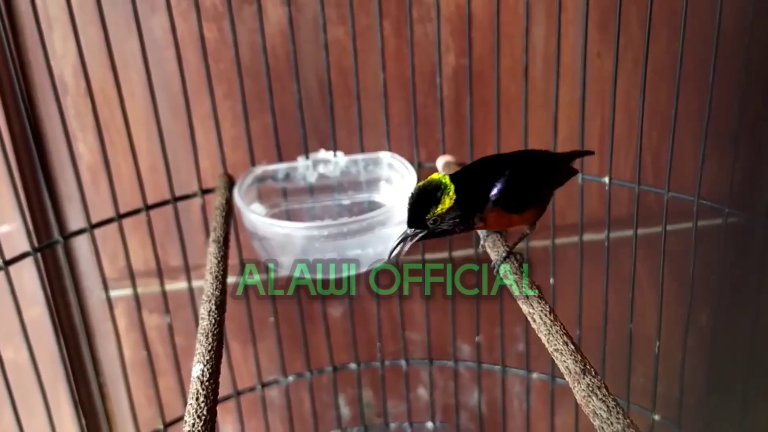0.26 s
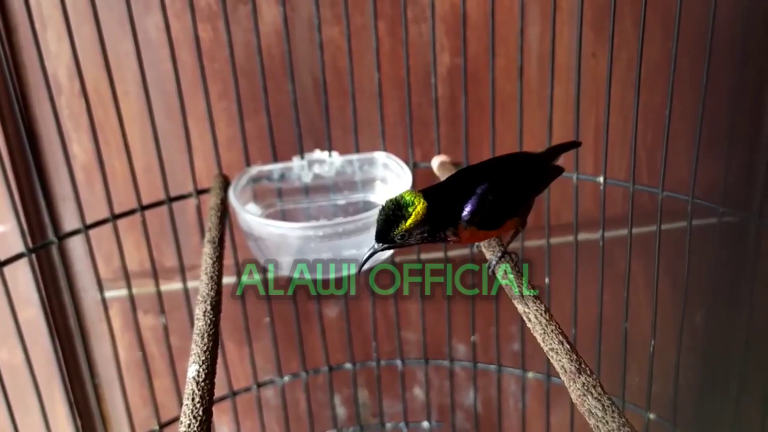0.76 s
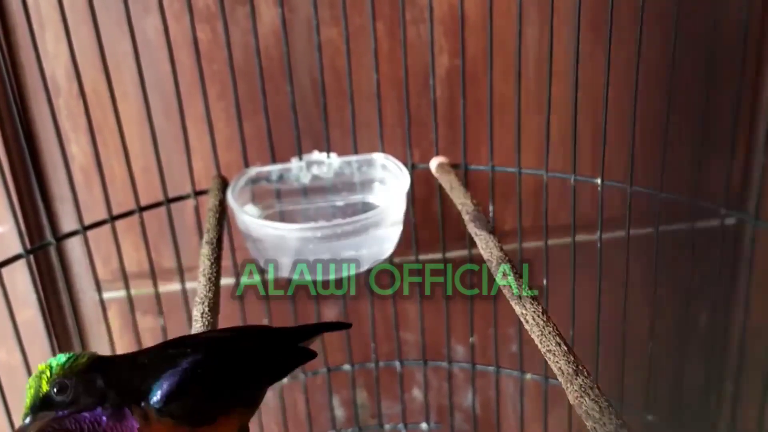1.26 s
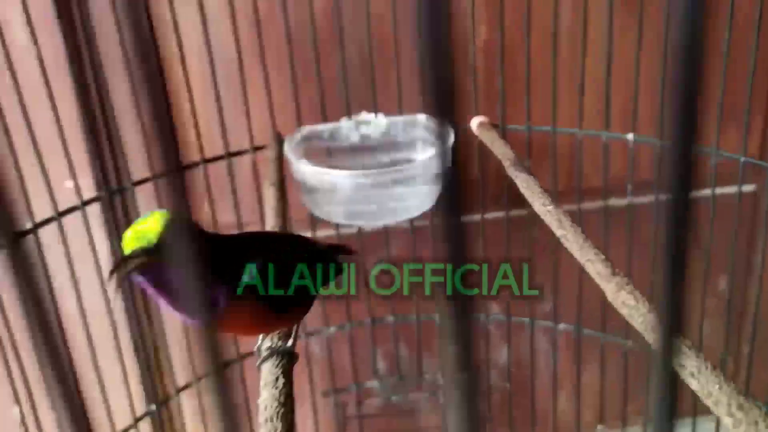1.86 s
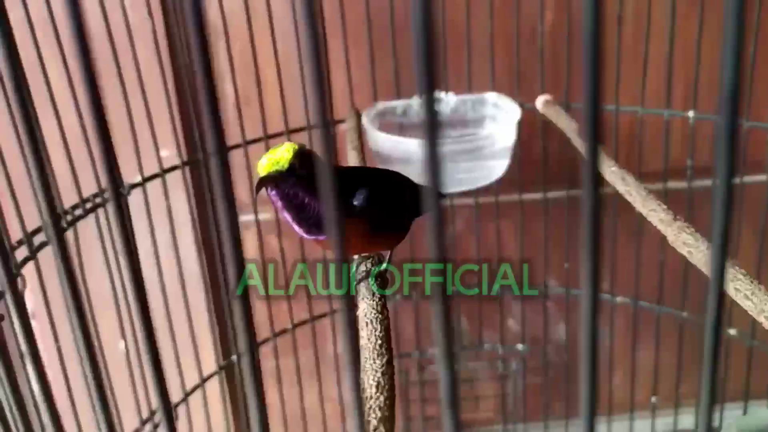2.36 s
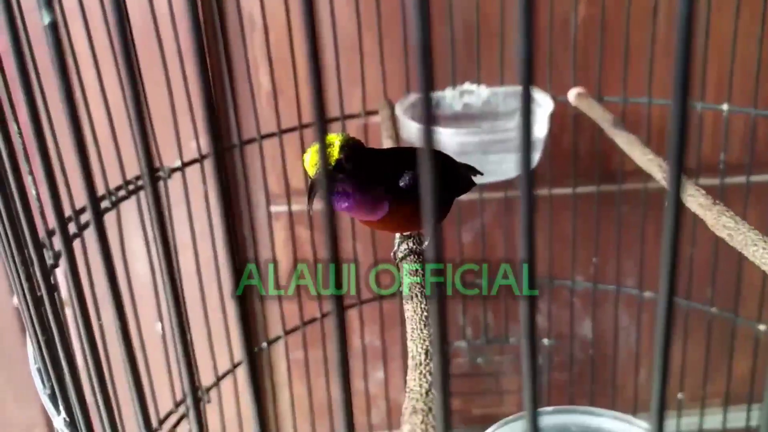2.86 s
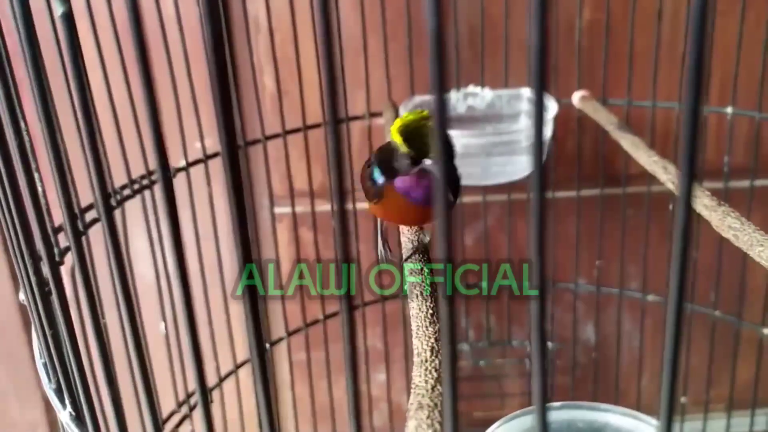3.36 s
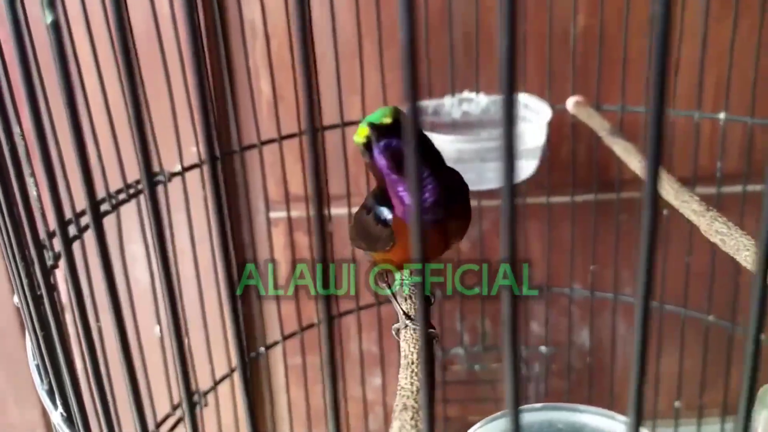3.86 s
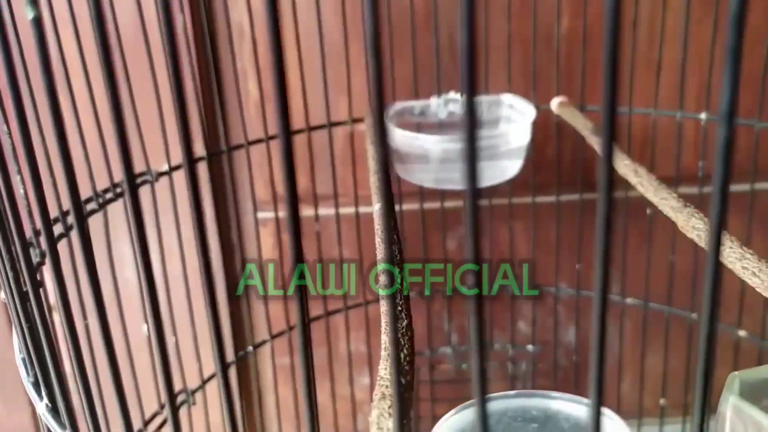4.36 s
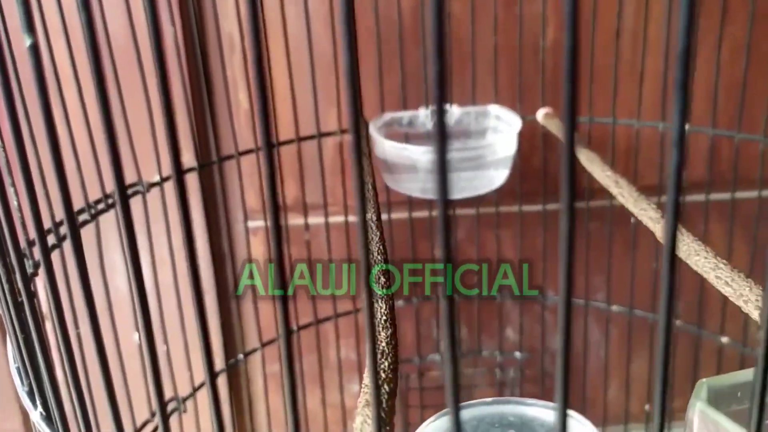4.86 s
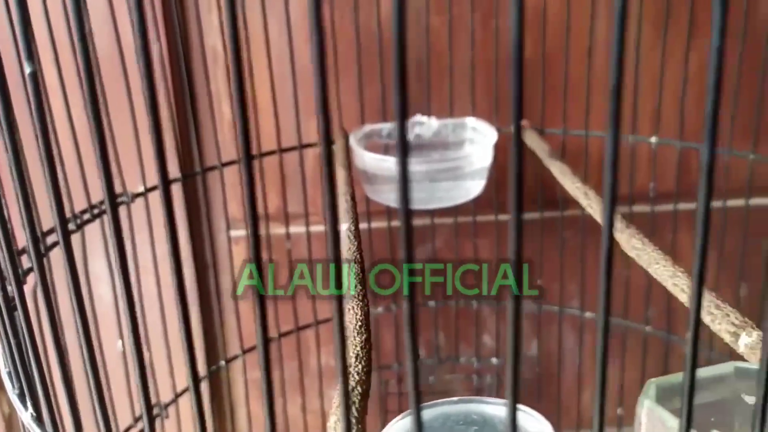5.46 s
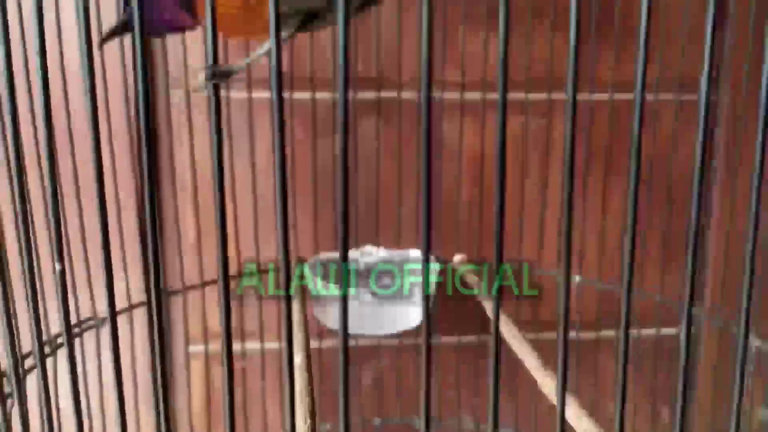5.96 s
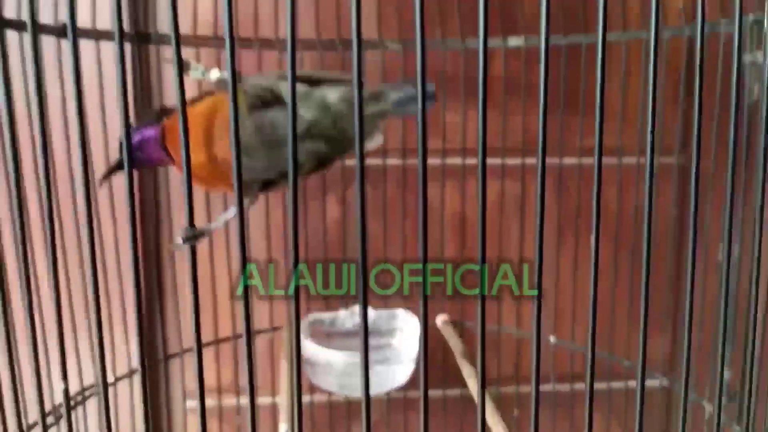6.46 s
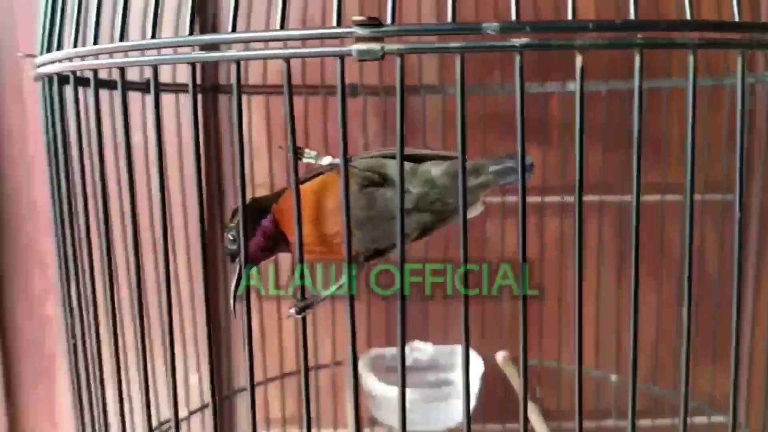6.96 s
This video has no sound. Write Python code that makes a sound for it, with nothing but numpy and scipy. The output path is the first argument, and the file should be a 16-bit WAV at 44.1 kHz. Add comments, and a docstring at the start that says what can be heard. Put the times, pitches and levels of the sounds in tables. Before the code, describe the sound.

A tiny caged sunbird sings right beside a stereo microphone in a hard room, its loud notes overloaded and leaning left. The echo of an earlier chirp is dying at the start. A clean, sharp arched chirp comes at 0.4 s, a faint distant call at 0.9, and a rougher chirp at 1.07. From 1.16 to 2.27 s a rasping trill runs at about fifteen short notes a second, around 4 to 6 kHz, with dry ticks; thin high ringing fades after it. A soft cage tick at 2.9 precedes a plain, trembling whistle near 4.2 kHz at 3.0, barely an eighth of a second long. A rough chirp follows at 3.7, a dull cage thump at 4.3, and a similar whistle at 5.0, then a distant falling call at 5.1. Faint bumps come at 5.65 and 6.6, and a final rough chirp at 6.97. Low wavering hum, rumble and air persist throughout.

```python
"""Caged sunbird singing indoors

A sunbird sings a hand's width from a small stereo microphone and overloads it: arched chirps, a rasping trill,
two plain whistles. Its voice is swept tones roughened by rattling snaps; thin steady resonances fade after the
trill, and decaying noise gives the hard room. Another bird calls faintly further off, heard only as echo.
Decaying sines and noise bump the cage softly; wavering sines hum like a mains appliance over rumble and air."""
import sys
import numpy as np
from scipy import signal
from scipy.fft import rfft, irfft, next_fast_len
from scipy.io import wavfile
from scipy.ndimage import map_coordinates

SR = 44100
rng = np.random.default_rng(int(sys.argv[2]) if len(sys.argv) > 2 else 0)


def waveform_to_disk(signal):
    """Save audio, clipped to [-1, 1], as 16-bit WAV at the path in sys.argv[1]."""
    frames = np.transpose(np.atleast_2d(signal))
    scaled = np.clip(frames, -1, 1) * 32767
    samples = np.round(scaled).astype(np.int16)
    wavfile.write(sys.argv[1], SR, samples)


N = 318402
LEAD = SR // 4   # the song is already under way: samples before time zero
TIME = np.arange(-LEAD, N) / SR   # s

# lowest tone near 60 Hz, uneven where hum, rumble and bumps mingle, before its trim: (time [s], level [dB])
LOW_HUM_LEVEL = [(0.0, -66), (0.04, -56), (.97, -43), (1.2, -52), (2.1, -47), (2.65, -53.5), (2.73, -38),
                 (3.04, -54), (3.36, -42.5), (3.58, -66), (3.96, -43), (4.24, -66), (4.28, -41),
                 (4.36, -53), (7.22, -58)]
# the steadier tone near 120 Hz: (time [s], level [dB])
HUM_OCTAVE_LEVEL = [(0.0, -55), (0.78, -44.5), (5.41, -49), (6.05, -57.5), (6.29, -54), (7.22, -53)]
# a 322 Hz drone, stronger towards the end: (time [s], level [dB])
DRONE_LEVEL = [(0, -68), (4.9, -72.5), (6.8, -55.5), (7.22, -56.5)]
# upper hum partials: (frequency [Hz], level [dB])
HUM_PARTIALS = [(161, -65.5), (181, -86.5), (241, -64), (301.5, -68), (361, -64.5), (480.5, -62),
                (640, -76), (722, -69), (770, -66.5), (963, -70.5)]
# colour of the low room rumble: (frequency [Hz], density [dB per Hz])
RUMBLE_COLOUR = [(20, -28.5), (40, -2.5), (58, 6.5), (75, 3.5), (100, 9.5), (150, -11.5), (250, -24.5)]
# colour of the room air: (frequency [Hz], density [dB per Hz])
AIR_COLOUR = [(20, -13), (100, 5), (200, 0), (400, -2), (500, 2.5), (800, 0.5), (1200, -2.5), (2500, -3.5),
              (4000, -4.5), (6500, -10), (8500, -7.5), (11000, -13), (14000, -16), (15500, -25.5)]
# how alike the two channels of the rumble and air are: (frequency [Hz], correlation [-1 to 1])
STEREO_LIKENESS = [(60, 1), (150, 0.38), (300, 0.84), (600, 0.099), (1500, 0.01298), (15000, 0.032)]

# reverberation time: (frequency [Hz], decay by 60 dB [s])
ROOM_T60 = [(2000, 0.68), (4300, 0.58), (6500, 0.47), (13000, 0.38)]
# tone colour of the reverberant tail: (frequency [Hz], gain [dB])
ROOM_COLOUR = [(2000, 5.5), (2900, 1.5), (4000, 0), (7000, -3.5), (8200, 4.5), (10000, 3), (15000, -3)]
# bearing of the sunbird: (time [s], delay of the left port behind the right [ms])
BEARING = [(.45, 0.34), (1.07, 0.14), (1.2, 0.018), (1.69, 0.041), (1.77, 0.061), (1.835, 0.066),
           (1.9, 0.095), (1.97, .11), (2.15, 0.13), (3.05, 0.15), (3.72, 0.23), (5, .32), (7, 0.27)]

# colour of the rattling membranes, and of the breath in a whistle: (frequency [Hz], density [dB per Hz])
RASP_COLOUR = [(1200, -39), (2200, -23.5), (2900, -13), (3500, -25), (4600, -1), (5800, -1.5),
               (7200, -11.5), (8500, -23.5), (11000, -15), (15000, -31)]
# colour of the hiss at the beak: (frequency [Hz], density [dB per Hz])
BEAK_HISS = [(3000, -25.5), (6500, -41), (7500, 2.5), (8500, -1.5), (10000, -8), (11000, -14), (12000, -11),
             (14000, -5), (15500, -11.5)]
# single chirps, levels before the drive:
# (time [s], length [s], start [Hz], top [Hz], end [Hz], level [dB], roughness [0-1])
CHIRPS = [ (-.11, 0.043, 4542, 6135, 4656, -5, 0.56), (.380, .033, 6063, 6798, 4614, 2.5, 0.06),
          (1.069, .037, 5760, 6613, 4907, 1.5, .75), (3.713, .034, 4970, 6735, 4890, 1.5, .5),
          (6.965, .035, 5400, 6360, 4670, 1, 0.64)]
# the other side of the syrinx sings a weaker, lower arch under some chirps:
# (time [s], length [s], start [Hz], top [Hz], end [Hz], level [dB], roughness [0-1])
LOW_VOICE = [ (0.384, 0.028, 4330, 4900, 3632, -9, 0.2), (3.722, 0.023, 4000, 4350, 3590, -15, 0.1),
             (6.977, 0.023, 3000, 3445, 2030, -22.5, 0.9)]
# falling slurs of the other bird, levels before the room: (time [s], length [s], level [dB])
FAR_CALLS = [(0.894, 0.053, -34.5), (4.7, 0.09, -37), (5.102, 0.074, -20)]
# notes of the trill, levels before the drive:
# (time [s], length [s], start [Hz], top [Hz], end [Hz], level [dB], roughness [0-1], rasp [dB])
TRILL = [ (1.163, .028, 4500, 6220, 4913, 1, 0.58, -12.5), (1.23, .026, 4300, 6064, 4864, 3, 0.13, -13.5),
         (1.296, 0.027, 4600, 6013, 4750, 0.5, 0.07, -11.5),
         (1.360, 0.027, 4400, 6010, 4453, 1.5, 0.05, -13.5),
         (1.421, 0.025, 4500, 5910, 4454, 4.5, 0.13, -10.5), (1.484, 0.026, 4200, 5885, 4234, 1, 0.09, -10),
         (1.553, .024, 4900, 5977, 4641, 5.5, .16, -10), (1.616, .027, 4500, 5983, 4295, 4.5, .16, -8.5),
         (1.685, 0.029, 4400, 5963, 4410, 3, .1, -9.5), (1.756, .025, 4700, 6030, 4737, 1.5, .12, -7),
         (1.823, 0.024, 4200, 5995, 4942, 3, 0.12, -6.5), (1.891, .024, 4500, 5976, 4990, 3, .1, -4.5),
         (1.961, 0.024, 4800, 6026, 5110, 2.5, .1, -6.5), (2.028, .025, 4800, 6093, 4950, 1.5, 0.11, -7),
         (2.103, 0.022, 4700, 6033, 5013, 2.5, 0.21, -6.5), (2.171, .021, 4900, 6080, 5050, 3.5, .1, -7),
         (2.248, 0.022, 4900, 6040, 4850, 2.5, .1, -7.5)]
# thin steady resonances fed by the trill, fading after it: (frequency [Hz], gain [dB], decay by 60 dB [s])
THIN_RINGS = [(7244, -1, .4), (9475, 7, .7), (10853, 3, .7), (12560, 3, .5)]
# dry ticks of the voice around the trill notes: (time [s], level [dB])
TICKS = [(1.548, -16.5), (1.891, -9), (1.946, -12.5), (1.959, -4.5)]
# soft bumps on the cage: (time [s], thud level [dB], pitch [Hz], tick level [dB])
BUMPS = [(2.914, -44, 95, -35.5), (4.285, -21, 82, -41), (5.654, -54, 130, -38), (6.605, -42, 140, -37)]
# whistles: (time [s], length [s], swell time [s], swell depth [dB], level [dB], octave level [dB],
# right port gain [dB])
WHISTLES = [ (2.995, 0.1243, 0.038, 34.5, 4.5, -25.5, -10.5), (4.974, 0.1335, 0.036, 13, 4.5, -31.5, -6.5)]
# wavering pitch, one list for each whistle: (time [s], pitch [Hz])
WHISTLE_PITCH = [
    [(2.999, 4045), (3.043, 4242), (3.093, 4333), (3.112, 4250), (3.12, 4020)],
    [(4.979, 4310), (4.99, 4094), (5.003, 4250), (5.028, 4158), (5.038, 4247), (5.044, 4215), (5.062, 4280),
     (5.078, 4152), (5.098, 4210), (5.107, 4000)],
]

CHIRP_RIGHT_DB, TRILL_RIGHT_DB = -8.5, -5.5   # direct sound at the right port
ROOM_RIGHT_DB = -0.5   # the room answers more weakly on the right
OCTAVE_RIGHT_DB = 1   # the octave of a whistle beams towards the right port
SNAPS_PER_S, SNAP_CYCLES, SNAP_SPREAD_DB = 6000, 50, 4   # tiny snaps of the rasp, each ringing briefly
BUZZ_HZ, BUZZ_WANDER = 476.4, 0.18   # a rough note breaks into strokes at about this rate, by this fraction
FAR_TOP_HZ, FAR_FALL_HZ = 5580, 1390   # where a slur starts and how far it falls
RELEASE_S = 0.0081   # a whistle stops quickly
CUTOFF_HZ = 15600


def from_db(db):
    """Decibels to gain."""
    return 10 ** (np.asarray(db) / 20)


def rms_one(x):
    """Scale to rms 1."""
    return x / np.sqrt(np.mean(x ** 2) + 1e-20)


def in_time(rows):
    """Each column of a curve at every sample."""
    s, *columns = np.transpose(rows)
    return [np.interp(TIME, s, c) for c in columns]


def at_hz(points, hz):
    """Read a table on a log-frequency axis."""
    f, value = np.transpose(points)
    return np.interp(np.log(np.maximum(hz, 1)), np.log(f), value)


def noise(spectrum):
    """Noise of a given colour, rms 1."""
    size = next_fast_len(len(TIME))
    hz = np.fft.rfftfreq(size, 1 / SR)
    coloured = rfft(rng.standard_normal(size)) * from_db(at_hz(spectrum, hz))
    return rms_one(irfft(coloured, size)[:len(TIME)])


def wobble(rate_hz):
    """Random motion up to a given rate, spread 1."""
    knots = np.arange(TIME[0], TIME[-1] + 1, .5 / rate_hz)
    return rms_one(np.interp(TIME, knots, rng.standard_normal(len(knots))))


def diffuse(spectrum):
    """Stereo noise from all sides: more alike in the bass than in the treble, rms 1."""
    size = next_fast_len(len(TIME))
    hz = np.fft.rfftfreq(size, 1 / SR)
    alike = np.clip(at_hz(STEREO_LIKENESS, hz), -1, 1)
    mid, side = rfft(rng.standard_normal((2, size))) * from_db(at_hz(spectrum, hz))
    both = np.sqrt(1 + alike) * mid + np.sqrt(1 - alike) * side * [[1], [-1]]
    return rms_one(irfft(both, size)[:, :len(TIME)])


def background(low_trim_db=-2.0, octave_trim_db=0.0, low_waver_db=3.0, octave_waver_db=2.0, rumble_db=-50, air_db=-45.5):
    """Hum of wavering partials, over low rumble and room air."""
    low_db, = in_time(LOW_HUM_LEVEL)
    high_db, = in_time(HUM_OCTAVE_LEVEL)
    drone_db, = in_time(DRONE_LEVEL)
    partials = [
        (59.8, low_db + low_trim_db + low_waver_db * wobble(3.5)),
        (120.6, high_db + octave_trim_db + octave_waver_db * wobble(3.7)),
        (322, drone_db)]
    partials += [(hz, db + 3 * wobble(1.312)) for hz, db in HUM_PARTIALS]
    hum = 0
    for hz, db in partials:
        phase = 2 * np.pi * hz * TIME + 0.372 * wobble(0.91)
        hum = hum + from_db(db) * np.sqrt(2) * np.sin(phase)   # sqrt(2): level is rms
    rumble = from_db(rumble_db) * diffuse(RUMBLE_COLOUR)
    air = from_db(air_db) * diffuse(AIR_COLOUR)
    return hum * from_db([[.4], [-.4]]) + rumble + air


def room(x, near_db=-16, near_s=0.0042, tail_db=-16, gap_s=0.00093):
    """Quick scatter from cage and wall, then a diffuse tail whose treble dies first."""
    t = np.arange(SR * 3 // 4) / SR
    edges, tail = np.geomspace(1000, 17000, 7), 0
    for low, high in zip(edges, edges[1:]):
        band_filter = signal.butter(2, [low, high], "band", fs=SR, output="sos")
        band = signal.sosfilt(band_filter, rng.standard_normal((2, len(t))))
        tail = tail + band * from_db(-60 * t / at_hz(ROOM_T60, np.sqrt(low * high)))
    colour = from_db(at_hz(ROOM_COLOUR, np.fft.rfftfreq(len(t), 1 / SR)))
    tail = irfft(rfft(tail) * colour, len(t))
    tail = tail * np.clip(t / gap_s - 1, 0, 1)   # silent until gap_s, full at twice that
    near = rng.standard_normal((2, len(t))) * np.exp(-t / near_s) * np.clip(t / 0.00064 - 1, 0, 1)
    response = (from_db(near_db) * rms_one(near) + from_db(tail_db) * rms_one(tail)) / np.sqrt(len(t))
    return signal.fftconvolve(x[None], response, axes=1)[:, :len(x)] * from_db([[0], [ROOM_RIGHT_DB]])


def ports(x, right_db):
    """The direct sound reaches the two ports at slightly different times and strengths."""
    lag_ms, = in_time(BEARING)
    early = map_coordinates(x, [np.arange(len(x)) + lag_ms * SR / 1000], order=3)
    return np.array([x, from_db(right_db) * early])


def syrinx(hz, octave_db, half_db=-70, blur=0.48):
    """A nearly pure tone with an unsteady octave; uneven cycles add a line an octave below."""
    phase = 2 * np.pi * np.cumsum(hz) / SR
    slip = blur * np.pi * wobble(350)
    octave = from_db(octave_db) * np.sin(2 * phase + slip)
    half = from_db(half_db) * np.sin(phase / 2 + slip)
    return np.sin(phase) + octave + half


def ring(x, hz, t60):
    """A two-pole resonance with gain 1 at its peak, dying by 60 dB in t60 seconds."""
    r = from_db(-60 / (t60 * SR))
    feedback = [1, -2 * r * np.cos(2 * np.pi * hz / SR), r * r]
    return signal.lfilter((1 - r * r) / 2 * np.array([1, 0, -1]), feedback, x + 1e-18)


def rattle(count=24):
    """Snaps of the membranes at random moments, each dealt one of a set of pitches; rms 1."""
    born = np.flatnonzero(rng.random(len(TIME)) < SNAPS_PER_S / SR)
    sizes = from_db(SNAP_SPREAD_DB * rng.standard_normal(len(born))) * rng.choice([-1, 1], len(born))
    dealt, out = rng.integers(0, count, len(born)), 0
    for k, hz in enumerate(np.geomspace(1500, 10000, count)):
        snaps = np.zeros(len(TIME))
        snaps[born] = sizes * (dealt == k)
        ringing = ring(ring(snaps, hz, SNAP_CYCLES / hz), hz, SNAP_CYCLES / hz / 2)
        out = out + from_db(at_hz(RASP_COLOUR, hz)) * ringing
    return rms_one(out)


def arches(notes, rise_s, fall_curve, off_top_db, flutter, shake, rasp_s, closing_db, hiss_db, rough_hiss,
           beak_db, half_db, lead_db, lead_s=0.025, edge_s=0.002, rasp_lead_s=0.00038):
    """Each note is one arch of pitch, loudest at its top; the membranes rattle as they start and stop."""
    hz, force, rough, rasp, lead = np.zeros((5, len(TIME)))
    for s, length, start_hz, top_hz, end_hz, level_db, roughness, rasp_db in notes:
        near = slice(*np.searchsorted(TIME, [s - length / 2, s + length * 1.5]))
        t = TIME[near] - s
        rising = np.clip(1 - t / rise_s, 0, 1) ** 2.5
        falling = np.clip((t - rise_s) / (length - rise_s), 0, 1) ** fall_curve
        sag_hz = rising * (top_hz - start_hz) + falling * (top_hz - end_hz)
        hz[near] = top_hz - sag_hz
        # the tone weakens by off_top_db for each kHz below its top
        edges = np.clip(np.minimum(t, length - t) / edge_s, 0, 1)
        force[near] = from_db(level_db + off_top_db * sag_hz / 1000) * edges
        # a faint high noise fades in before the arch and stops at its top
        lead[near] = from_db(level_db + lead_db) * np.clip(1 + t / lead_s, 0, 1) * (t < rise_s)
        rough[near] = roughness
        opening = np.exp(-.5 * ((t + rasp_lead_s) / rasp_s) ** 2)
        closing = np.exp(-.5 * ((t - length) / rasp_s) ** 2)
        rasp[near] = from_db(rasp_db) * (opening + from_db(closing_db) * closing)
    buzz_phase = 2 * np.pi * np.cumsum(BUZZ_HZ * (1 + BUZZ_WANDER * wobble(250))) / SR
    strokes = np.sin(buzz_phase) + 0.55 * wobble(300)
    fluttering_hz = hz * (1 + flutter * rough * wobble(1100))
    tone = syrinx(fluttering_hz, octave_db=-40.0, half_db=half_db) * force * (1 + shake * rough * strokes)
    rasping = rattle() * (rasp + force * (from_db(hiss_db) + rough_hiss * rough))
    return tone + rasping + (from_db(beak_db) * force + lead) * noise(BEAK_HISS)


def chirps(drive_db=2.27, rasp_db=-13):
    """Long single arches; the rougher a chirp, the more it rasps."""
    notes = []
    for *shape, level_db, rough in CHIRPS:
        note_rasp_db = rasp_db + 20 * np.log10(max(rough, 1e-3))
        notes.append((*shape, level_db + drive_db, rough, note_rasp_db))
    return arches(notes, rise_s=.0115, fall_curve=1.6, off_top_db=-5.5, flutter=.04, shake=1.0, rasp_s=0.0049,
                  closing_db=2.5, hiss_db=-25.0, rough_hiss=0.39, beak_db=-19, half_db=-34.0, lead_db=-34,
                  edge_s=0.00362)


def low_voice(rasp_db=-32):
    """The other side of the syrinx: weaker, lower arches under some chirps."""
    notes = [(*row, rasp_db) for row in LOW_VOICE]
    return arches(notes, rise_s=0.012, fall_curve=0.808, off_top_db=-4, flutter=0.021, shake=0.38, rasp_s=.003,
                  closing_db=10, hiss_db=-42, rough_hiss=0.084, beak_db=-26, half_db=-55.5, lead_db=-40)


def far_bird(fall_curve=2.0, octave_db=-19, hiss_db=-16):
    """Each slur swells, tips over and falls away in pitch."""
    hz, force = np.zeros((2, len(TIME)))
    for s, length, level_db in FAR_CALLS:
        near = slice(*np.searchsorted(TIME, [s, s + length]))
        part = np.clip((TIME[near] - s) / length, 0, 1)
        hz[near] = FAR_TOP_HZ - FAR_FALL_HZ * part ** fall_curve
        force[near] = from_db(level_db) * np.sin(np.pi * part ** 1.14)
    return force * (syrinx(hz, octave_db) + from_db(hiss_db) * noise(BEAK_HISS))


def trill(drive_db=1.1):
    """Short arches, about fifteen a second."""
    notes = [(*shape, level_db + drive_db, rough, rasp_db) for *shape, level_db, rough, rasp_db in TRILL]
    return arches(notes, rise_s=0.0089, fall_curve=2.1, off_top_db=-5.5, flutter=0.046, shake=0.87, rasp_s=0.0043,
                  closing_db=-4.0, hiss_db=-28.0, rough_hiss=0.23, beak_db=-23.5, half_db=-25.0, lead_db=-47.5)


def thin_rings(x):
    """Thin steady resonances driven by the sound they are fed, fading after it."""
    return sum(from_db(db) * ring(x, hz, t60) for hz, db, t60 in THIN_RINGS)


def ticks(tick_s=0.00078):
    """A few milliseconds of rattle with no tone."""
    force = 0
    for s, db in TICKS:
        force = force + from_db(db) * np.exp(-np.minimum(.5 * ((TIME - s) / tick_s) ** 2, 20))
    return rattle() * force


def bumps(thud_s=0.0024, tick_s=0.0088, attack_s=0.0014):
    """A dull thud of the frame, a fast-dying sine, with a short woody tick of noise."""
    thud, tick = np.zeros((2, len(TIME)))
    for s, level_db, hz, tick_db in BUMPS:
        t = np.maximum(TIME - s, 0)
        thud -= from_db(level_db) * np.sin(2 * np.pi * hz * t) * np.exp(-np.minimum(t / thud_s, 20))
        tick += from_db(tick_db) * np.minimum(t / attack_s, 1) * np.exp(-np.minimum(t / tick_s, 20))
    # tick colour: (frequency [Hz], density [dB per Hz])
    return thud + tick * noise([(100, -1.0), (400, -1), (900, -5.0), (2500, -28), (10000, -38)])


def whistle(s, length, swell_s, swell_db, level_db, octave_db, pitch, quiver=0.003, tremor_db=1.36,
            hiss_db=-53, octave_lead=0.73, attack_s=0.0068):
    """A held tone that swells, trembles and stops; its breathy octave stands out while it is soft."""
    t = np.clip(TIME - s, 0, length)
    hz, = in_time(pitch)
    soft_db = swell_db * np.clip(1 - t / swell_s, 0, 1) ** 1.15
    attack = np.clip(t / attack_s, 0, 1)
    release = np.clip((length - t) / RELEASE_S, 0, 1) ** 2
    force = from_db(level_db - soft_db + tremor_db * wobble(60)) * attack * release
    quivering_hz = hz * (1 + quiver * wobble(450))
    tone = syrinx(quivering_hz, octave_db - level_db + octave_lead * soft_db, blur=0.51)
    return force * (tone + from_db(hiss_db) * noise(RASP_COLOUR))


def beamed(x, right_db):
    """A whistle at the ports: the tone favours the left, its octave the right."""
    octave = signal.sosfiltfilt(signal.butter(6, 6500, "high", fs=SR, output="sos"), x)
    return ports(x - octave, right_db) + ports(octave, OCTAVE_RIGHT_DB)


def scene(far_room_db=21, trill_room_db=1.5, chirp_room_db=3.0):
    """The near bird is heard directly and through the room, the far bird only as echo from the next room."""
    single = chirps() + low_voice()
    run = trill() + ticks()
    whistles = [whistle(*row[:-1], pitch) for row, pitch in zip(WHISTLES, WHISTLE_PITCH)]
    far, _ = room(far_bird())   # the next room, one channel
    direct = ports(single, CHIRP_RIGHT_DB) + ports(run, TRILL_RIGHT_DB)
    direct = direct + sum(beamed(w, row[-1]) for w, row in zip(whistles, WHISTLES))
    echo = room(from_db(chirp_room_db) * single + from_db(trill_room_db) * run + from_db(far_room_db) * far)
    echo = echo + room(sum(whistles), near_db=-23, tail_db=-17)
    return (direct + echo + thin_rings(run) + bumps() + background())[:, LEAD:]


def record(dry, knee=6.12):
    """The loud notes flatten at full scale with a narrow knee; the top is cut."""
    clipped = dry / (1 + np.abs(dry) ** knee) ** (1 / knee)
    return signal.sosfilt(signal.ellip(10, .1, 85, CUTOFF_HZ, fs=SR, output="sos"), clipped)


dry = scene()
out = record(dry)
waveform_to_disk(out)
```